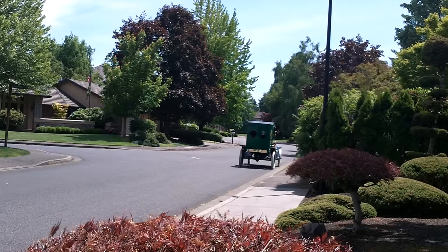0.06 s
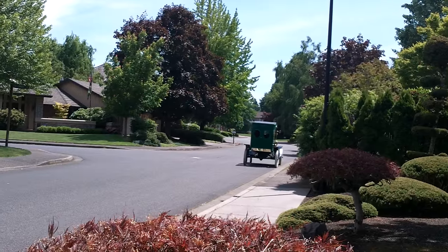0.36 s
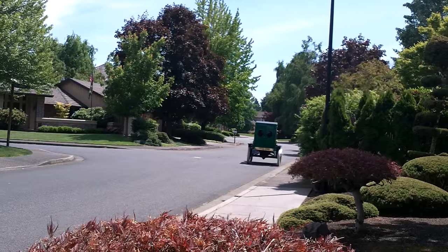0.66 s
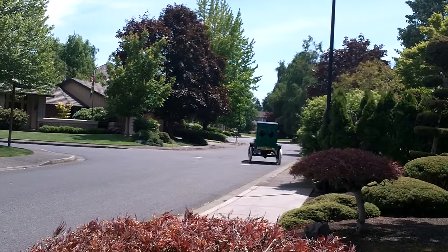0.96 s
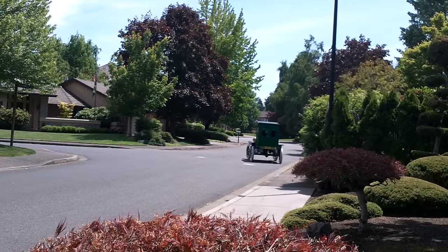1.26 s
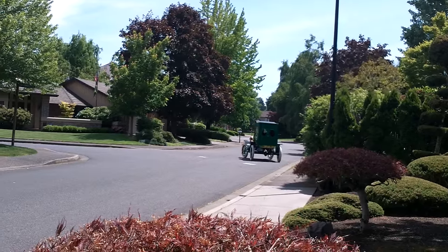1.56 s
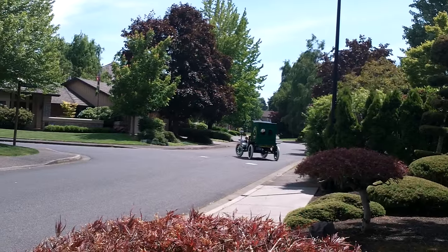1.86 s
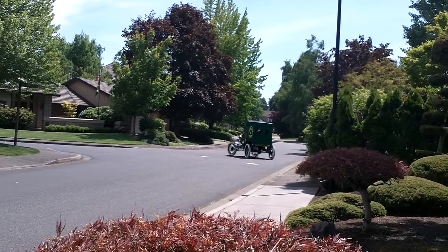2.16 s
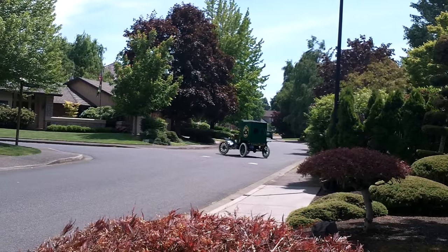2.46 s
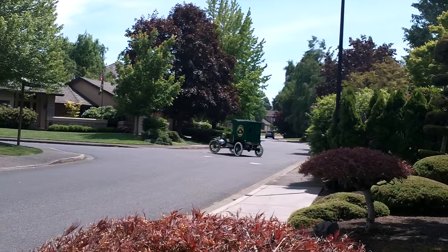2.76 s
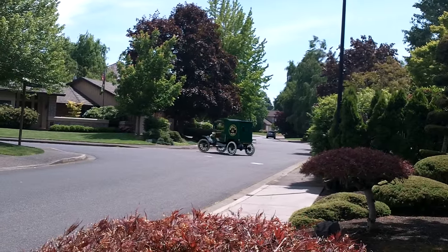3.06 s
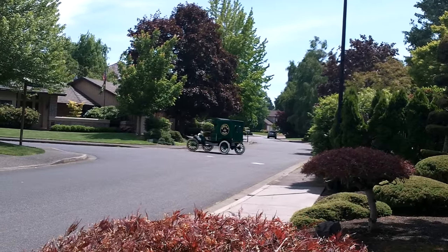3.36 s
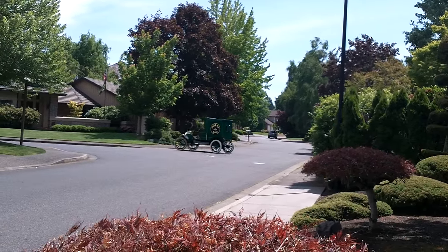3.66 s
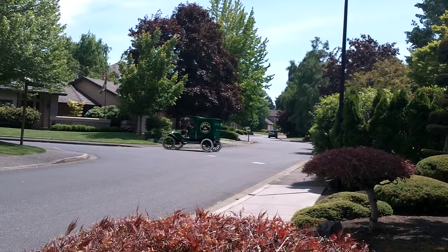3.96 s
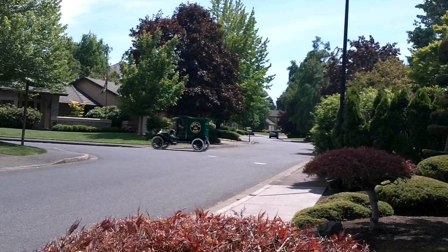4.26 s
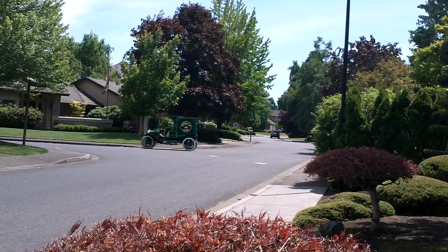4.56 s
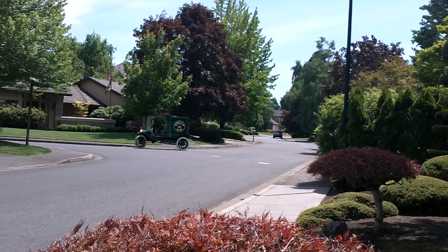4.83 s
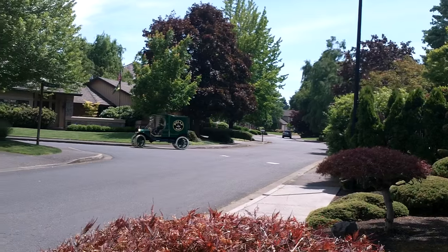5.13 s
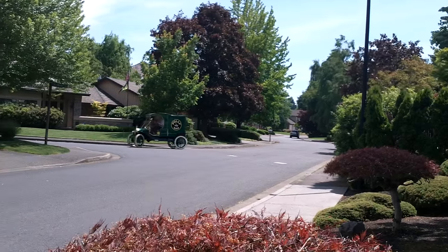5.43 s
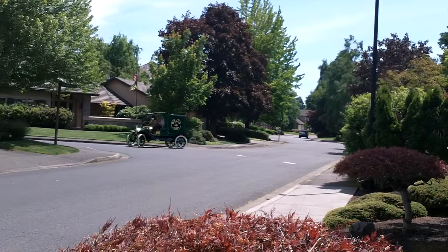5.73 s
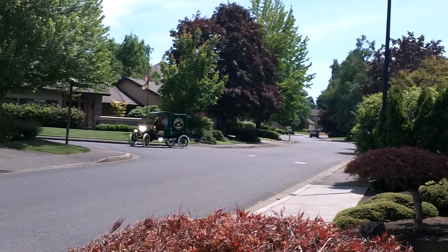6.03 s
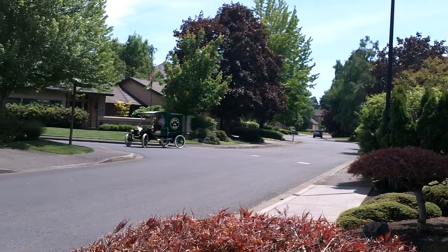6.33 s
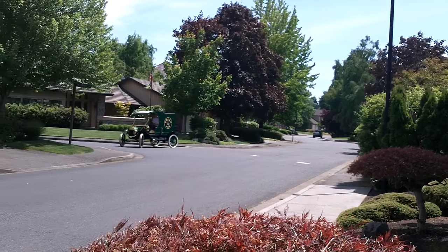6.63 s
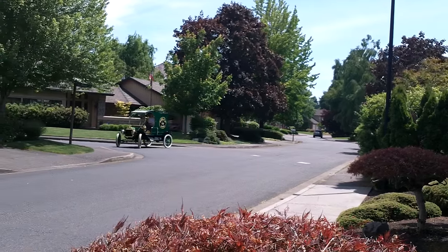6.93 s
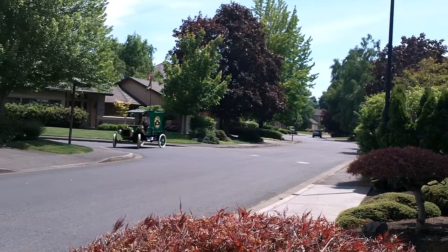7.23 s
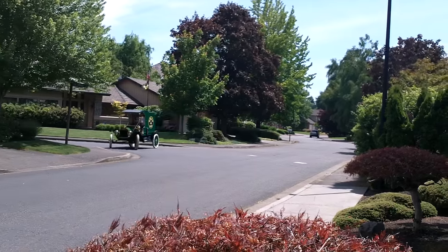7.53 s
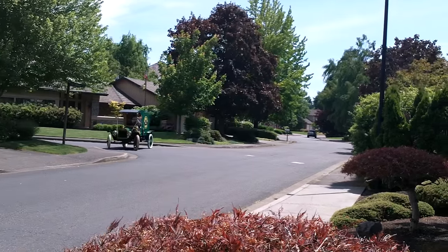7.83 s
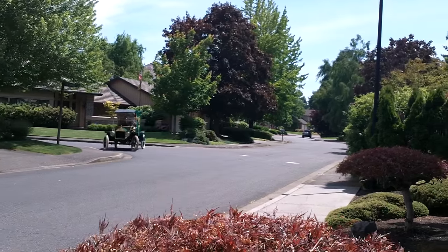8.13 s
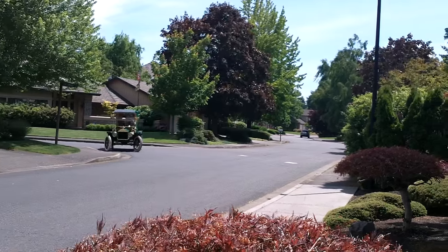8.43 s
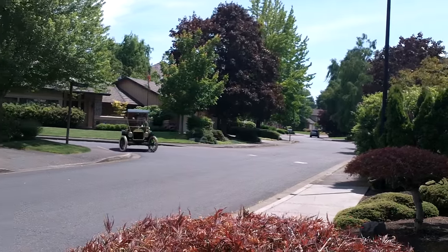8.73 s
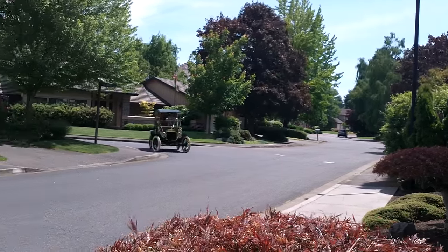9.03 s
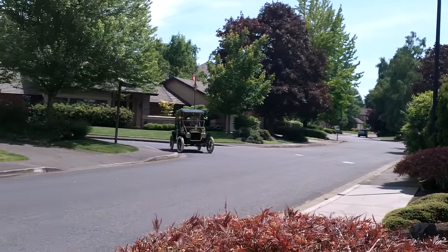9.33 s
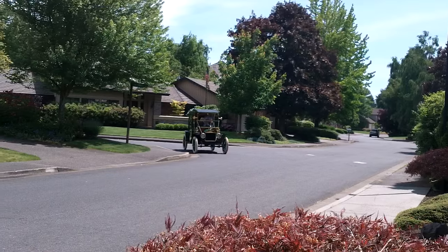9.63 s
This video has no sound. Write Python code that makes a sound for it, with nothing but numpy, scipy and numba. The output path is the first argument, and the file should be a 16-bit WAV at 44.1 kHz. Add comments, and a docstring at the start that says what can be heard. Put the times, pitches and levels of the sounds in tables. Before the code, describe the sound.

An antique car chuffs and clatters down a quiet street, turns and comes back, while wind gusts buffet the microphone.

```python
"""An antique four-cylinder car chuffs away down a quiet street, turns and comes back at steady low revs.
From behind its exhaust puffs, from the front its valves clatter on the block; houses and trees scatter
both. Gusts buffet the microphone, and the camera's limiter ducks the car under the hardest ones."""
import sys
import numpy as np
from scipy import signal
from scipy.fft import rfft, irfft, next_fast_len
from scipy.io import wavfile
from scipy.ndimage import uniform_filter1d
from numba import njit

SR = 44100
rng = np.random.default_rng(int(sys.argv[2]) if len(sys.argv) > 2 else 0)


def waveform_to_disk(signal):
    """Save audio, clipped to [-1, 1], as 16-bit WAV at the path in sys.argv[1]."""
    frames = np.transpose(np.atleast_2d(signal))
    scaled = np.clip(frames, -1, 1) * 32767
    samples = np.round(scaled).astype(np.int16)
    wavfile.write(sys.argv[1], SR, samples)


N = 431738
T = np.arange(N) / SR


def undb(db):
    """Decibels to gain."""
    return 10 ** (np.asarray(db) / 20)


def unit(x):
    """Scale to rms 1."""
    return x / np.sqrt(np.mean(x ** 2))


def even(x, window_s):
    """Hold short-term power at 1."""
    return x / np.sqrt(uniform_filter1d(x ** 2, int(window_s * SR)) + 1e-9)


def curve(rows):
    """Interpolate (time, value) rows per sample."""
    return np.interp(T, *np.transpose(rows))


def colour(x, spectrum):
    """Filter by a (Hz, dB) spectrum."""
    size = next_fast_len(N + 8192)
    hz, db = np.transpose(spectrum)
    bins_hz = np.maximum(np.fft.rfftfreq(size, 1 / SR), 1)
    gain = undb(np.interp(np.log(bins_hz), np.log(hz), db))
    return irfft(rfft(x, size) * gain, size)[:N]


def noise(spectrum):
    """Coloured noise, rms 1."""
    return unit(colour(rng.standard_normal(N), spectrum))


def ring(x, modes):
    """Resonator bank of (Hz, width Hz, dB), rms 1."""
    return unit(sum(undb(db) * signal.lfilter(*signal.iirpeak(hz, hz / width, fs=SR), x)
                    for hz, width, db in modes))


def struck(modes, rise_s=0.001):
    """A blow: decaying sines of (Hz, t60 s, dB)."""
    t = T[:SR // 8]
    sines = sum(undb(db - 60 * t / t60) * np.sin(2 * np.pi * hz * t) for hz, t60, db in modes)
    return sines * (1 - np.exp(-t / rise_s))


def walk(rate_hz):
    """Slewed random steps, spread near 1."""
    hold = int(SR / rate_hz)
    steps = np.repeat(rng.standard_normal(N // hold + 1), hold)
    return 1.25 * uniform_filter1d(steps, hold)[:N]


def lag(x, tau_s):
    """One-pole smoothing."""
    pole = np.exp(-1 / (tau_s * SR))
    return signal.lfilter([1 - pole], [1, -pole], x)


def rattle(kicks, rise_s, decay_s, floor, grain_db):
    """A grainy noise burst per kick over a steady floor, at even mean power."""
    gate = lag(lag(kicks, rise_s), decay_s)
    gate = np.sqrt(unit(gate) ** 2 + floor ** 2)
    return even(gate, 0.5) * undb(grain_db * walk(1500)) * rng.standard_normal(N)


def tone(crank, order, waver_db, drift_rad):
    """A wavering harmonic of the engine cycle, rms 1; crank counts firings, four a cycle."""
    phase = 2 * np.pi * (order * crank / 4 + rng.random())
    return unit(np.sin(phase + drift_rad * walk(12)) * undb(waver_db * walk(6)))


# street noise (frequency [Hz], level [dB])
STREET_SPECTRUM = [(30, 5), (120, -13.5), (300, -12.5), (600, -8), (1000, -12), (2000, -14), (5000, -18.5),
                   (7000, -28.5), (8200, -34), (15500, -47.5)]


def street():
    """Quiet background, slowly wavering in level."""
    return noise(STREET_SPECTRUM) * undb(-41 + walk(2.044))


def echoes(x, t60_s=1, level_db=-11, positions=12):
    """Dull scatter from houses and trees; the pattern crossfades as the car moves."""
    t, out = T[:SR // 2], 0
    for k in range(positions):
        response = rng.standard_normal(len(t)) ** 3 * undb(-60 * t / t60_s) * (t > 0.012)
        response = lag(response, 0.00005)
        fade = np.sqrt(np.maximum(1 - np.abs(T / T[-1] * (positions - 1) - k), 0))
        out = out + signal.oaconvolve(x * fade, response / np.linalg.norm(response))[:N]
    return undb(level_db) * out


def swell(start_s, length_s, attack_s, release_s):
    """Gust envelope: ramp centred on the start, hold, exponential release."""
    out = np.zeros(N)
    span = slice(max(int((start_s - attack_s) * SR), 0), int((start_s + length_s + 8 * release_s) * SR))
    t = T[span] - start_s
    out[span] = np.clip(t / attack_s + 0.5, 0, 1) * np.exp(-np.maximum(t - length_s, 0) / release_s)
    return out


# rumble between gusts (time [s], level [dB])
BREEZE_LEVEL = [(0, -23.5), (2.6, -23), (3.2, -30.5), (3.7, -24), (4.45, -30.5), (5.2, -32), (7, -31.5),
                (8.3, -35), (9.79, -34)]
# gusts (start [s], length [s], strength [dB], relative tearing [dB])
WIND_GUSTS = [(0.27, 0.014, -28, -28), (0.419, 0.074, -29, -25), (0.568, 0.14, -25, -33),
              (0.667, 0.052, -14, -8), (0.747, 0.044, -13, -12), (0.831, 0.11, -17.5, -14.5),
              (0.972, 0.097, -12, -16), (1.03, 0.025, -14, -5), (1.112, 0.028, -13.5, -25),
              (1.165, 0.065, -13, -8), (1.23, 0.073, -15.5, -12.5), (1.331, 0.077, -18.5, -17),
              (1.419, 0.089, -19.5, -13), (1.501, 0.11, -21, -22), (1.693, 0.09, -26.5, -15),
              (1.823, 0.11, -18.5, -26), (2.043, 0.13, -17.5, -28), (2.155, 0.09, -12, -3.5),
              (2.258, 0.053, -21.5, -28), (2.428, 0.076, -24, -16), (2.673, 0.11, -44, -22),
              (2.985, 0.036, -35, -12), (4.703, 0.27, -40, -21), (5.146, 0.22, -53, -26),
              (5.347, 0.15, -39.5, -22), (5.867, 0.019, -32.5, -8), (5.956, 0.14, -26, -15),
              (6.1, 0.035, -20.5, -27), (6.207, 0.11, -27, -21), (6.316, 0.097, -16, -10),
              (6.436, 0.16, -23, -12.5), (6.577, 0.062, -18.5, -20), (6.72, 0.054, -27, -8),
              (6.806, 0.07, -12.5, -10.5), (7.302, 0.15, -35.5, -20), (7.754, 0.016, -39, -20),
              (8.89, 0.094, -49, -22), (9.717, 0.035, -30.5, -20)]
# wind rumble, eddies and fastest eddies (frequency [Hz], level [dB])
RUMBLE_SPECTRUM = [(10, -14.5), (22, 2), (42, -1.5), (70, -4), (110, -10), (170, -22.5), (260, -28),
                   (500, -47.5), (1200, -69), (4000, -96)]
FLUTTER_SPECTRUM = [(50, -5), (110, 6.5), (180, 5), (280, -4.5), (400, -12.5), (600, -37), (1000, -59),
                    (4000, -87)]
TEARING_SPECTRUM = [(200, 2), (400, 9.5), (550, 1.5), (800, -9), (1200, -29), (2000, -26.5), (5000, -76)]


def wind(fits_db=3.5):
    """The breeze rumbles; gusts add rumble and shed eddies that flutter and tear in fits."""
    rumble_gain, flutter_gain, tearing_gain = undb(curve(BREEZE_LEVEL)), 0, 0
    for start_s, length_s, db, tearing_db in WIND_GUSTS:
        gust = swell(start_s, length_s, attack_s=0.032, release_s=0.032) * undb(-11 + 0.3 * db)
        eddies = swell(start_s, length_s, attack_s=0.037, release_s=0.011) * undb(db)
        rumble_gain = np.maximum(rumble_gain, gust)
        flutter_gain = np.maximum(flutter_gain, eddies)
        tearing_gain = np.maximum(tearing_gain, eddies * undb(tearing_db))
    fits = undb(fits_db * walk(90))
    rumble = even(noise(RUMBLE_SPECTRUM), 0.0644) * rumble_gain
    flutter = even(noise(FLUTTER_SPECTRUM) * fits, 0.0301) * flutter_gain
    tearing = even(noise(TEARING_SPECTRUM) * fits, 0.049) * tearing_gain
    return rumble + flutter + tearing


# eddy impacts (crest [s], peak [dB], brightness [dB], spike half width [s])
EDDY_HITS = [(0.487, 3, -25, 0.0022), (0.503, -7, -10, 0.0025), (0.588, -0.5, -36, 0.0048),
             (0.615, -2.5, -35, 0.0035), (.669, 1, -22, 0.0014), (.707, -10, -4.5, 0.00077),
             (.711, -7, -14.5, 0.00084), (0.758, 3, -16.5, 0.0014), (0.991, -9, -32, 0.0013),
             (1.072, -1, -16, 0.0015), (1.18, -11, -22, 0.00083), (1.191, -10.5, -12.5, 0.00085),
             (1.276, -3, -18.5, 0.00094), (1.372, 1, -25, 0.0033), (1.541, -4, -26.5, 0.0016),
             (1.601, -5.5, -17.5, .0012), (2.136, -1, -20, 0.0027), (2.18, 0.5, -19, 0.001),
             (2.203, -5, -17.5, 0.0011), (2.242, 0, -20, 0.0018), (2.346, 0, -22, 0.0053),
             (2.46, 1.5, -17, 0.0013), (5.444, -14, -36, 0.0034), (6.032, 2.5, -25.5, 0.0017),
             (6.119, -3, -37, 0.0042), (6.341, -4.5, -26, 0.0039), (6.368, -5, -14.5, 0.00092),
             (6.372, -7.5, -10, 0.00058), (6.588, -3.5, -22, 0.0012), (6.636, -0.5, -21.5, 0.0029),
             (6.738, -2.5, -14, 0.002), (6.816, -1.5, -18, 0.0025), (6.841, 3, -27.5, 0.002)]


def buffets(tear_db=-7, tear_s=0.0033):
    """An eddy hits the microphone port: a rounded pressure spike, a tearing burst on its crest."""
    out = np.zeros(N)
    t = T[:SR // 10] - T[SR // 20]
    for crest_s, peak_db, bright_db, width_s in EDDY_HITS:
        corner_hz = np.clip(1900 * undb(0.74 * bright_db), 150, 4000)
        lowpass = signal.butter(3, corner_hz, fs=SR, output="sos")
        tear = signal.sosfilt(lowpass, rng.standard_normal(2 * len(t)))
        tear = even(tear, 0.0072)[len(t):] * np.exp(-(t / tear_s) ** 2)
        u = (t / width_s) ** 2
        spike = (1 - u) / (1 + u) ** 2
        at = int(crest_s * SR) - SR // 20
        out[at:at + len(t)] += undb(peak_db) * (spike + undb(tear_db) * tear)
    return out


# slow air pressure swings (crest [s], length [s], peak [dB])
PRESSURE_SURGES = [(0.444, 0.034, 1.5), (0.518, 0.052, -1), (0.726, 0.037, 3.5), (0.771, 0.036, 1.5),
                   (1.039, 0.062, 1.5), (1.09, 0.066, 2.5), (1.224, 0.17, -8.5), (1.384, 0.042, -6),
                   (1.506, 0.096, -3), (1.74, 0.036, -5.5), (2.07, 0.092, -11.5), (2.166, 0.25, -4.5),
                   (2.47, 0.047, 2), (6.078, 0.096, -3), (6.411, 0.11, -0.5), (6.65, 0.065, 0),
                   (6.768, 0.034, 6), (6.845, 0.12, -10)]


def surges():
    """Smooth humps of pressure, almost too deep to hear, that overload the microphone."""
    out = np.zeros(N)
    for crest_s, length_s, peak_db in PRESSURE_SURGES:
        span = np.abs(T - crest_s) < length_s / 2
        out[span] += undb(peak_db) * np.cos(np.pi * (T[span] - crest_s) / length_s) ** 2
    return out


# gear whine (time [s], level [dB])
WHINE_LEVEL = [(0, -72), (3.5, -61), (5.2, -60), (5.4, -56), (5.8, -55), (6.1, -62), (7, -62), (7.4, -50.5),
               (7.8, -52), (8.3, -53), (8.6, -62), (9.1, -61), (9.4, -51.5), (9.79, -55)]


def gear_whine(crank):
    """The gears sing a flickering tone locked to engine speed."""
    whine = tone(crank, order=86, waver_db=2, drift_rad=0.7)
    return whine * undb(curve(WHINE_LEVEL) + 3 * walk(35) - 1)


# chassis resonances (frequency [Hz], width [Hz], level [dB])
CHASSIS_MODES = [(641, 42, -1), (694, 113, -4), (980, 88, -12)]
# chassis ring (time [s], level [dB])
CHASSIS_LEVEL = [(0, -55.5), (2.6, -50.5), (4.6, -46.5), (5.4, -48.5), (6.3, -44), (7, -50.5), (7.7, -42.5),
                 (8.4, -46.5), (8.8, -66), (9.4, -44), (9.79, -48.5)]


def chassis(pulses):
    """Exhaust pulses shake a hollow ring from the chassis."""
    shaking = rattle(pulses, rise_s=0.007, decay_s=0.007, floor=0.22, grain_db=3.5)
    return ring(shaking, CHASSIS_MODES) * undb(curve(CHASSIS_LEVEL))


# tappet blows (time [s], level [dB], pitch [Hz])
TAPPET_PINGS = [(8.074, -32, 1520), (8.176, -29.5, 1620), (8.28, -26, 1630), (8.311, -27, 1605),
                (8.45, -27, 1607), (8.586, -28.5, 1640), (8.724, -26, 1580), (8.86, -27, 1565),
                (8.962, -30, 1550), (8.996, -27, 1572), (9.099, -28.5, 1560), (9.131, -26, 1565),
                (9.266, -26, 1555), (9.401, -27.5, 1605), (9.538, -29.5, 1590), (9.675, -27.5, 1595)]
# tappet ring (pitch ratio, t60 [s], level [dB])
TAPPET_MODES = [(1, .045, -1), (1.42, .03, -11), (3.25, .035, -9)]
# running gear blows (time [s], level [dB])
GEAR_CLUNKS = [(7.578, -35), (7.957, -32), (8.262, -29), (8.297, -33), (8.329, -34), (8.399, -31),
               (8.436, -29), (8.573, -35), (8.674, -33), (8.71, -32), (8.845, -29.5), (8.979, -30),
               (9.52, -30.5), (9.655, -33)]
# running gear ring (frequency [Hz], t60 [s], level [dB])
GEAR_MODES = [(714, .05, -2), (1020, 0.044, -1.5), (1120, 0.037, -1.5)]


def pings_and_clunks():
    """On the way back a tappet pings about once a cycle and the running gear clunks."""
    blows = [(time_s, db, [(hz * ratio, t60, mode_db) for ratio, t60, mode_db in TAPPET_MODES])
             for time_s, db, hz in TAPPET_PINGS]
    blows += [(time_s, db, GEAR_MODES) for time_s, db in GEAR_CLUNKS]
    out = np.zeros(N + SR)
    for time_s, db, modes in blows:
        sound, at = undb(db) * struck(modes), int(time_s * SR)
        out[at:at + len(sound)] += sound
    return out[:N]


# metal contacts (time [s], tick [dB], ring [dB], pitch [Hz])
CLINK_HITS = [(.002, -24, -32, 2340), (.032, -34, -28, 2920), (.064, -33, -34, 2450),
              (.102, -27, -31, 2370), (.13, -30, -28, 2940), (.165, -42, -28, 2370), (.23, -33, -31, 2330),
              (0.26, -29, -23, 2940), (.294, -45, -41, 3030), (.361, -33, -34, 2380),
              (0.391, -29, -27, 2510), (0.423, -38, -30, 2950), (0.652, -33, -33, 1460),
              (.978, -25, -30.5, 2360), (1.279, -21, -30, 2340), (1.312, -18.5, -31, 1460),
              (1.448, -19.5, -32, 1875), (1.584, -19, -32, 1480), (1.616, -21.5, -37, 1475),
              (1.651, -24, -33, 2060), (1.686, -23, -39, 3340), (1.72, -19, -27.5, 1537),
              (1.824, -20.5, -36, 1520), (1.989, -21, -25, 2605), (2.025, -30, -35, 1505),
              (2.397, -22, -29, 2930), (2.565, -25, -33, 1660), (2.632, -31, -36, 3800),
              (2.666, -28, -45, 1875), (2.699, -37, -36, 1860), (3.005, -41, -40, 1560),
              (3.109, -41, -34, 1560), (3.142, -32, -30, 1610), (3.176, -44, -30, 2500),
              (3.212, -44, -37, 1480), (3.245, -43, -35, 2940), (3.281, -41, -31, 2435),
              (3.319, -35, -29, 1605), (3.351, -41, -28, 1515), (3.593, -40, -34, 1745),
              (3.627, -33, -40, 3020), (3.66, -32, -37, 2140), (3.9355, -23, -30, 2360),
              (4.0348, -22, -26.5, 1510), (4.071, -20, -33, 1500), (4.173, -19, -36, 2910),
              (4.28, -26, -37, 2330), (4.557, -28, -48, 1480), (4.589, -23, -43, 1510),
              (4.625, -25, -44, 2440), (4.658, -24, -55, 1500), (4.693, -23, -39, 3050),
              (4.725, -23.5, -46, 2440), (4.792, -19.5, -36, 1500)]
# contact tick (frequency [Hz], level [dB])
TICK_SPECTRUM = [(600, -19), (2000, 4.5), (3200, 5), (5400, 5.5), (6500, 1.5), (8000, -15.5), (15500, -25)]
# panel ring (pitch ratio, t60 [s], level [dB])
PANEL_MODES = [(1, .05, 1), (1.04, 0.029, -11), (1.62, .035, -11)]


def clinks():
    """Valve taps and loose metal: each a bright tick and a short panel ring."""
    kicks, rings = np.zeros(N), np.zeros(N)
    for time_s, tick_db, ring_db, pitch_hz in CLINK_HITS:
        at = int(time_s * SR)
        kicks[at] = undb(tick_db)
        panel = struck([(pitch_hz * ratio, t60, db) for ratio, t60, db in PANEL_MODES])
        rings[at:at + len(panel)] += undb(ring_db) * panel
    t = T[:SR // 12]
    envelope = (1 - np.exp(-t / 0.0015)) * np.exp(-t / 0.008)
    ticks = signal.fftconvolve(kicks, envelope)[:N] * noise(TICK_SPECTRUM)
    return ticks * undb(-8.5) + rings


def zing(contact, hz=5070, width_hz=61):
    """Valve knocks make thin sheet metal zing in fits."""
    return ring(contact, [(hz, width_hz, 0)]) * undb(-23 + 6.4 * walk(16))


# puffs and knocks of one cycle (place [firings], rear [dB], front [dB], block drive [dB])
CYCLE_STROKES = [(-.1, 8, 0, 0.5), (0.377, -19, 6, -0.5), (.88, 7, -2, 0), (1.349, -32, 3, 3.5),
                 (1.842, 4, -5, 1), (2.419, -20.5, 2.5, -3.5), (2.91, 8, 1.5, -1), (3.417, -36, 3, -5.5)]


def strokes(crank, facing, scatter_db=1.3, jitter_s=0.0004):
    """Slightly uneven impulse trains for the exhaust puffs and the valve knocks."""
    puffs, knocks = np.zeros((2, N))
    cycles = 4 * np.arange(int(crank[-1] / 4) + 2)
    for place, rear_db, front_db, block_db in CYCLE_STROKES:
        jitter, scatter = rng.standard_normal((100, 2))[:len(cycles)].T
        times_s = np.interp(cycles + place, crank, T, left=-1, right=-1) + jitter_s * jitter
        heard = (times_s >= 0) & (times_s < T[-1])
        at = (times_s[heard] * SR).astype(int)
        size = (1 - facing[at]) * undb(rear_db) + facing[at] * undb(front_db)
        size *= undb(scatter_db * scatter[heard])
        puffs[at] += size
        knocks[at] += size * undb(block_db)
    return puffs, knocks


# block and bonnet resonances (frequency [Hz], width [Hz], rear [dB], front [dB])
BLOCK_MODES = [(1137, 95, -12, 12), (1525, 31, 12, 2), (1588, 85, 9.5, 14.5), (2140, 90, -14.5, 2),
               (2540, 80, -18, -11), (3140, 75, -5, 4), (3660, 100, -17, -1), (5150, 83, -10, -12)]
# block ring relative to the clatter (time [s], level [dB])
BLOCK_LEVEL = [(0, -12.5), (1.2, -13), (2.5, -12.5), (3.3, -4), (4.2, -12.5), (5, -14), (6.2, -13),
               (7.2, -6.5), (8.4, -5), (9.1, -5), (9.79, -7.5)]


def engine_block(contact, facing):
    """Valves ring block and bonnet; the timbre follows the heading."""
    rear = ring(contact, [(hz, width, db) for hz, width, db, _ in BLOCK_MODES])
    front = ring(contact, [(hz, width, db) for hz, width, _, db in BLOCK_MODES])
    return ((1 - facing) * rear + facing * front) * undb(curve(BLOCK_LEVEL) + 1)


# exhaust pulses of one cycle (place [firings], level [dB])
CYCLE_PULSES = [(-.42, 2.5), (.53, 3), (1.49, -1), (2.45, -3.5)]


def firings(crank, scatter_db=2.1):
    """One pressure pulse per cylinder, limping alike every cycle."""
    pulses = np.zeros(N)
    cycles = 4 * np.arange(1, int(crank[-1] / 4))
    for place, db in CYCLE_PULSES:
        at = (np.interp(cycles + place, crank, T) * SR).astype(int)
        pulses[at] += undb(db + scatter_db * rng.standard_normal(100)[:len(at)])
    return pulses


# pipe and silencer resonances (frequency [Hz], width [Hz], level [dB])
PIPE_MODES = [(155, 44, 0), (240, 40, -2.5), (335, 45, -10)]
# exhaust chug and drone (time [s], level [dB])
CHUG_LEVEL = [(0, -42), (2.5, -38), (4.2, -42), (5, -42), (7, -40.5), (7.7, -41), (8.6, -40.5),
              (9.2, -42.5), (9.79, -42.5)]
DRONE_LEVEL = [(0, -36.5), (3, -32), (4.4, -36), (5.5, -38.5), (7.8, -41), (8.6, -44), (9.2, -44),
               (9.79, -39)]


def exhaust_chug(crank, pulses):
    """Each firing rings pipe and silencer briefly, above a deep drone."""
    chug = 0
    for hz, width, db in PIPE_MODES:
        mode = ring(pulses, [(hz, width, 0)])
        chug = chug + undb(db) * ring(mode, [(hz, hz / 2, 0)])  # steeper skirts
    drone = tone(crank, order=8, waver_db=3, drift_rad=0.23)
    return unit(chug) * undb(curve(CHUG_LEVEL)) + drone * undb(curve(DRONE_LEVEL))


# puff and clatter noise (frequency [Hz], level [dB])
PUFF_SPECTRUM = [(200, -6.5), (500, -11), (900, -2.5), (1300, -6), (2300, 3), (3100, 1), (3900, -2),
                 (5200, -2.5), (6100, -6.5), (7000, -15), (7900, -21), (10000, -25.5), (12500, -39.5),
                 (15500, -44)]
# tailpipe mouth resonances (frequency [Hz], width [Hz], level [dB])
RASP_MODES = [(2410, 160, 1), (3040, 94, 13)]
# rasp under throttle (time [s], level [dB])
RASP_LEVEL = [(0, -47), (.35, -47), (.6, -64), (1.5, -87), (9.79, -79)]


def exhaust_puffs(puffs, facing, clatter_gain):
    """Gas hisses out in puffs; the tailpipe rasps until the driver eases off."""
    whirr = 0.36 + 0.41 * facing  # fan and timing gears fill the gaps, most from the front
    gas = rattle(puffs, rise_s=0.0018, decay_s=0.007, floor=whirr, grain_db=1)
    hiss = unit(colour(gas, PUFF_SPECTRUM)) * clatter_gain * undb(-0.6 * facing)
    rasp = ring(gas + unit(puffs), RASP_MODES) * undb(curve(RASP_LEVEL))
    return hiss + rasp


# engine speed (time [s], firing rate [Hz])
FIRING_RATE = [(0.0, 30.94), (0.8, 30.5), (1.6, 29.39), (2.4, 29.75), (2.8, 29.5), (3.2, 28.82),
               (4.0, 29.27), (4.4, 28.77), (4.8, 29.2), (6.0, 29.68), (6.8, 29.16), (7.2, 29.83),
               (8.0, 29.08), (9.2, 29.53), (9.79, 29.25)]
# clatter as the car leaves, turns and returns (time [s], level [dB])
CLATTER_LEVEL = [(0, -38.5), (.9, -42), (2.4, -40.5), (2.8, -41), (3.4, -43.5), (4.7, -42.5), (5.1, -47),
                 (5.8, -43), (6.3, -39.5), (7, -37.5), (7.8, -40.5), (8.6, -40), (9.79, -35.5)]
# side towards the listener (time [s], heading [0 tail .. 1 radiator])
HEADING = [(0, 0), (2.2, 0.065), (4.5, 0.35), (5.4, 0.54), (7, 1), (8.3, 0.56), (9.79, 1)]


def car():
    """One crank times puffs, valves, gears and chugs; loose parts clink and clunk on top."""
    crank = np.cumsum(curve(FIRING_RATE)) / SR - 0.17
    facing = curve(HEADING)
    clatter_gain = undb(curve(CLATTER_LEVEL))
    puffs, knocks = strokes(crank, facing)
    pulses = firings(crank)
    chuffs = exhaust_puffs(puffs, facing, clatter_gain)
    chatter = rattle(knocks, rise_s=0.0005, decay_s=0.0035, floor=0.25, grain_db=2)
    contact = unit(knocks) + 0.82 * chatter
    body = chassis(pulses) + gear_whine(crank)
    valves = (engine_block(contact, facing) + facing * zing(contact)) * clatter_gain
    return chuffs + valves + body + clinks() + pings_and_clunks() + exhaust_chug(crank, pulses)


def scene():
    """Car and street reach the right port a sample sooner; wind hits both.
    Treble distortion crackles on the loudest peaks."""
    engine = car()
    outdoors = engine + echoes(engine) + street()
    stereo = np.array([np.r_[0, outdoors[:-1]], outdoors])
    air = wind() + buffets()
    overload_hiss = (undb(-99) + undb(-38) * air ** 2) * rng.standard_normal((2, N))
    return stereo + air + surges() + overload_hiss


@njit
def peak_hold(x, release):
    """Peak follower: instant attack, exponential release."""
    out, peak = np.empty(len(x)), 0.
    for i in range(len(x)):
        peak = max(x[i], peak * release)
        out[i] = peak
    return out


def limiter(x, ceiling_db=-7, attack_s=0.0013, release_s=0.046):
    """Duck everything while peaks pass the ceiling; a buffet's first edge slips through."""
    peaks = peak_hold(np.abs(x).max(axis=0), np.exp(-1 / (release_s * SR)))
    cut = 1 - np.minimum(undb(ceiling_db) / (peaks + 1e-9), 1)
    return x * (1 - lag(cut, attack_s))


# dips in the camera's response (frequency [Hz], width [Hz])
TREBLE_NOTCHES = [(4215, 830), (7880, 1500), (8790, 830), (12600, 820)]


def record(dry, low_cut_hz=15.5, top_hz=15100):
    """Camera chain: limiter, low cut, soft clip, treble notches, top cut."""
    out = limiter(dry)
    out = signal.sosfilt(signal.butter(2, low_cut_hz, "highpass", fs=SR, output="sos"), out)
    out = out / (1 + (out / 0.95) ** 6) ** (1 / 6)
    for hz, width in TREBLE_NOTCHES:
        out = signal.lfilter(*signal.iirnotch(hz, hz / width, fs=SR), out)
    return signal.sosfilt(signal.ellip(8, 0.2, 80, top_hz, fs=SR, output="sos"), out)


dry = scene()
out = record(dry)
waveform_to_disk(out)
```